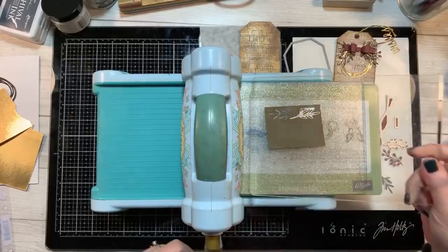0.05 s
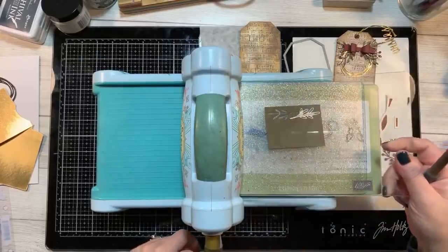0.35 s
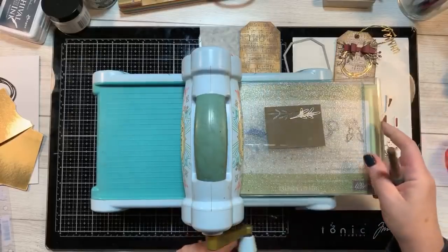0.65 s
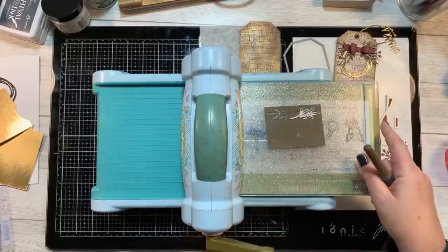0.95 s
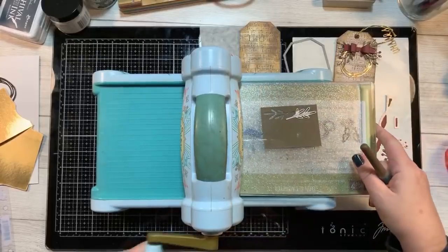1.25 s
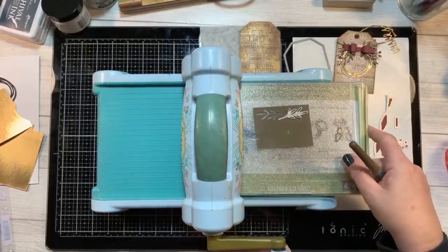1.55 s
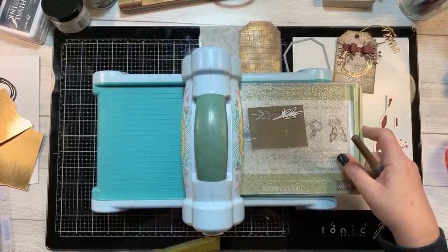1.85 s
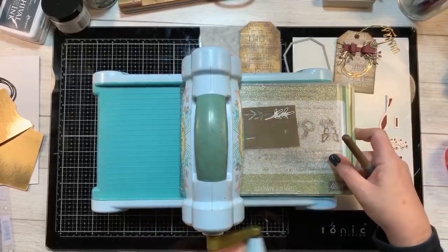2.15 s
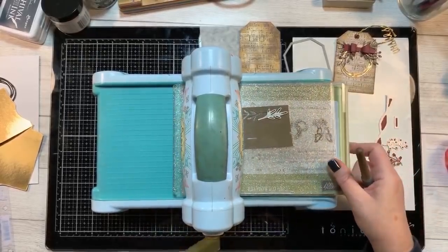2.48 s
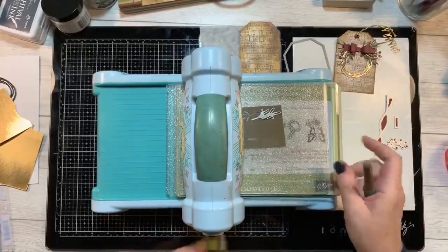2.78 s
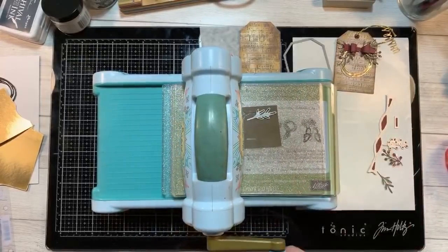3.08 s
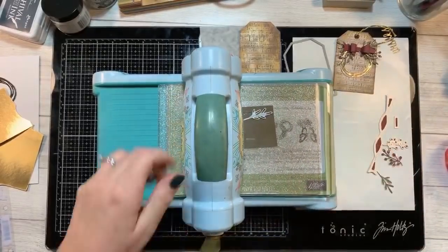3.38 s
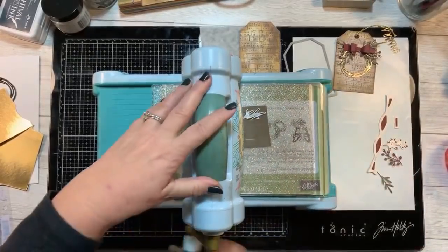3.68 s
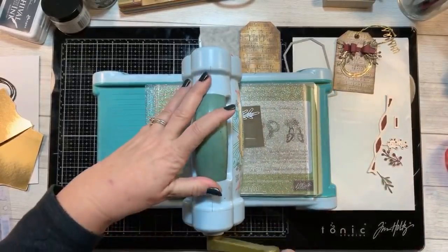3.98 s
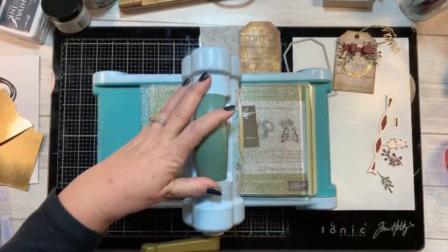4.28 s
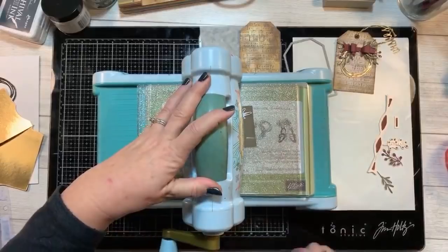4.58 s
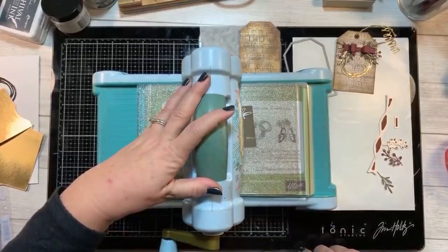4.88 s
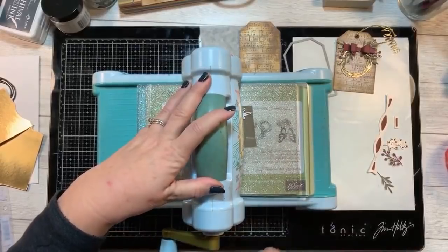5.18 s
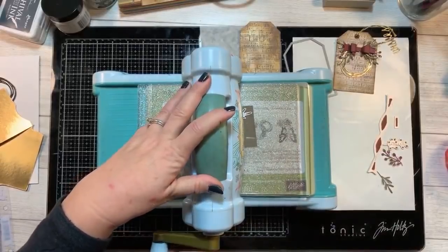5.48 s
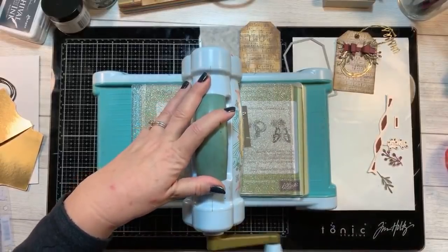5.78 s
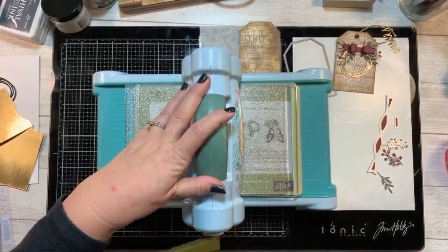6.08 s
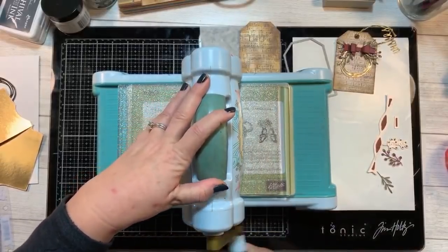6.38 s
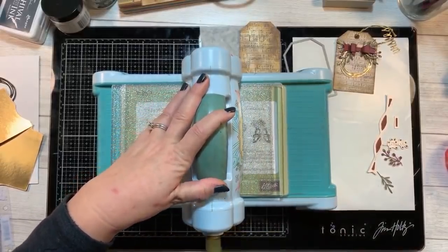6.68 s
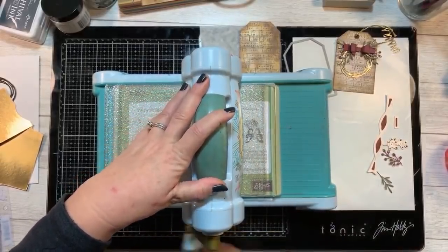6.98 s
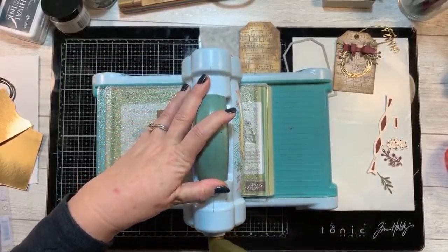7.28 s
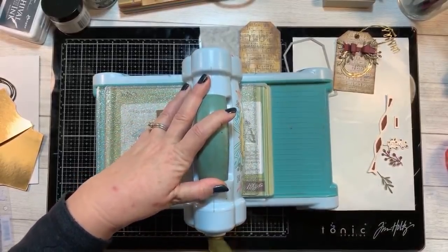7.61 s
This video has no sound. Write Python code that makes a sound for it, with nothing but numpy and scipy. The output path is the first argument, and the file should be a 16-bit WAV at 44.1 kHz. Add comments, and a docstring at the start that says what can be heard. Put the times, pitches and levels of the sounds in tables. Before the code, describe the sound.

In a small room with a steady hiss, a die-cutting machine is cranked by hand, heard from just above. Plastic plates butt against the rollers with two clunks, then pass through with irregular hollow gear knocks, dry snaps and soft scraping over a low table rumble. A dull bump and a faint squeal mark a short lull before the knocking returns and the plates give a loud crack.

```python
"""Two hollow clunks: plastic plates butt against the rollers of a hand-cranked die-cutting machine.
They are cranked through: gear teeth knock in the hollow housing, the rollers grind, and the squeezed
plates, die and paper crack and rub, with one faint squeal in a lull. The machine bumps and rocks,
and the craft table rumbles under the turning hand. Heard from just above, in a small room with a
steady hiss."""
import sys
import numpy as np
from scipy import signal
from scipy.fft import rfft, irfft
from scipy.io import wavfile

SR = 44100
rng = np.random.default_rng(int(sys.argv[2]) if len(sys.argv) > 2 else 0)


def unload_audio(sound):
    """Save the sound as a 16-bit wav file, at the path given as the first command line argument."""
    columns = np.transpose(np.atleast_2d(sound))
    # keep every value between -1 and 1, then stretch to whole-number steps
    steps = np.round(np.clip(columns, -1, 1) * 32767)
    wavfile.write(sys.argv[1], SR, steps.astype(np.int16))


N = 337365
HIT_S, ATTACK_S = .4, .025
HIT_N = int(HIT_S * SR)
AGE_S, CLOCK_S = np.arange(HIT_N) / SR, np.arange(N) / SR
SCATTER_DB = 2.5
ROCK_HZ, ROCK_T60_S = 58.8, .34  # machine rocking on the table
BOARD_HZ, BOARD_T60_S = 128.3, .099  # table top

# Table levels are relative; the functions add gains. *_EDGES_HZ are band edges.
# loud gear knocks: t/s, level/dB, tilt/(dB/octave), rocking/dB
KNOCKS = [(0.222, -45.5, -2, -69), (0.26, -41, -4, -64), (0.49, -54.5, 0.5, -67), (0.538, -45.5, 0.5, -62),
          (0.853, -53.5, -3.5, -59), (0.869, -52.5, -6, -58), (0.984, -50, -4, -45.5),
          (1.01, -52, 0.5, -45), (1.203, -53, -5, -68), (1.215, -48.5, -4.5, -51), (1.296, -48.5, -2, -49),
          (1.322, -47, -3, -59), (1.473, -52.5, 0, -51), (1.566, -47.5, 3.5, -43.5), (1.631, -45, 1, -42.5),
          (1.655, -42.5, -2.5, -47), (1.724, -59, -8, -50), (1.894, -47.5, 0.5, -57),
          (1.925, -54.5, 2.5, -62), (1.996, -50.5, -2.5, -61), (2.069, -50, -3, -47.5),
          (2.196, -47.5, -1.5, -56), (2.311, -47.5, -1.5, -53), (2.33, -59, 0.5, -56),
          (2.396, -49, -3, -48), (2.596, -50.5, -0.5, -57), (2.711, -54, -1.5, -61), (2.792, -56, 2.5, -48),
          (2.817, -56, 5, -61), (2.855, -57, -10, -52), (2.92, -61.5, 5.5, -54.5), (2.993, -55.5, 4, -72),
          (3.058, -52, 1.5, -61), (3.079, -47, -1.5, -50.5), (3.112, -57.5, 2.5, -60), (3.31, -62, -1, -55),
          (3.385, -66, -6, -55), (3.59, -53, 2, -48.5), (3.802, -56, 0.5, -66), (3.858, -46.5, -3, -58),
          (3.975, -54.5, -2.5, -55), (3.995, -53.5, 1, -52), (4.203, -49, -3, -50.5),
          (4.235, -50, -2.5, -57), (5.326, -41.5, 0, -56), (5.402, -58.5, 2.5, -55),
          (5.449, -58.5, -2.5, -68), (5.496, -50.5, -2, -45), (5.557, -49, -1.5, -60),
          (5.72, -55, -3.5, -50), (5.758, -55.5, 1, -61), (5.86, -54.5, -2.5, -58),
          (5.902, -50, -2.5, -50.5), (6.215, -56.5, 2.5, -51), (6.313, -58.5, 2, -49.5),
          (6.448, -63, 1, -68), (6.556, -53.5, 0.5, -58), (6.661, -52, 0.5, -62), (6.967, -54, -1, -66),
          (7.104, -56, -7, -74), (7.149, -48.5, 2.5, -56), (7.178, -50.5, -6, -61), (7.334, -56, -1, -48),
          (7.349, -52, 0, -70), (7.502, -62, -7.5, -52), (7.557, -60.5, -3.5, -58)]
KNOCK_EDGES_HZ = [210, 600, 1150, 2800, 7000]
KNOCK_BAND_DB = [-4.5, .93, -6.5, -14.5]
# crank load, as roller grinding: t/s, level/dB
CRANK_LOAD = [(0, -77), (.15, -79), (.3, -56.5), (.48, -39), (.62, -63), (.81, -73), (1.17, -60),
              (1.32, -54.5), (1.44, -62), (1.68, -55), (1.84, -65), (1.98, -50), (2.28, -65.5),
              (2.85, -54.5), (3.2, -66.5), (3.6, -58), (3.75, -69), (4.26, -63), (4.56, -79.5), (5.2, -90),
              (5.5, -61), (6.02, -66), (6.3, -59), (6.85, -64.5), (7.12, -55), (7.28, -69), (7.65, -71)]
# plates meeting the rollers: t/s, then level/dB per band
PLATE_HITS = [(0.1459, -26.5, -27, -30.5, -40.5, -44), (0.4006, -27.5, -36, -44, -49.5, -55)]
PLATE_EDGES_HZ = [200, 560, 1150, 2800, 7000, 16000]
# stack cracking: t/s, level/dB, tilt/(dB/octave), treble edge/Hz, note/Hz, note t60/s
CRACKS = [(0.331, -47.5, -3, 7000, 1970, 0.047), (0.694, -49.5, -3.5, 5000, 1533, .12),
          (1.31, -56, 0, 10000, 1740, .015), (1.365, -48.5, -.7, 10000, 1720, .012),
          (1.5205, -51, 0.5, 8000, 1766, 0.064), (1.528, -50, 1.5, 8000, 1630, .02),
          (1.546, -43.5, 0.5, 11500, 1650, 0.069), (1.7101, -48, 0, 4260, 4700, 0.062),
          (1.838, -60.5, -1, 6000, 2030, .012), (2.009, -48.5, -1, 8000, 4820, 0.061),
          (2.054, -55, 0.5, 5000, 2120, 0.016), (2.5787, -51, -1, 6260, 5960, 0.039),
          (2.7, -54, -4, 6000, 6000, 0.046), (2.909, -55.5, -6, 5000, 1730, 0.0091),
          (3.085, -51.5, -4, 11000, 3180, 0.01), (3.196, -77, 3.5, 15000, 8410, .012),
          (3.612, -47.5, -3, 6500, 3220, 0.049), (3.776, -51.5, 7, 6900, 6220, 0.033),
          (3.869, -49.5, -1.5, 4860, 3240, 0.0091), (4.212, -57, 0, 6030, 4980, .012),
          (4.283, -64.5, 3.5, 15000, 8410, 0.0098), (4.665, -61, 3.5, 9000, 3870, 0.0079),
          (4.681, -54, -3, 10000, 1750, 0.056), (5.3242, -47.5, 2.5, 4800, 3670, 0.04),
          (5.327, -57.5, 4, 7000, 6480, 0.089), (5.565, -64.5, 1.5, 15000, 1571, 0.014),
          (5.854, -53, -3, 2580, 2200, 0.021), (6.662, -52.5, -2.5, 6000, 2070, 0.019),
          (6.9938, -34.5, -0.7, 9300, 1974, .04), (6.995, -42.5, 3.5, 4500, 3120, 0.032),
          (6.9953, -42.5, -1, 12000, 1600, .11)]
CRACK_EDGES_HZ = [300, 1150, 2800, 7000, 10000, 16000]
CRACK_BAND_DB = [-.67, -.44, .38, -.74, -.5]
# plates rubbing on the bed: t/s, level/dB
BED_RUB = [(0, -59.5), (.12, -68.5), (.42, -57), (.81, -65), (1.02, -61.5), (1.4, -62.5), (1.68, -65),
           (1.8, -64), (2.08, -57), (2.45, -68), (2.9, -64), (3.25, -69), (3.65, -64.5), (4.26, -73),
           (4.6, -82), (5.2, -82), (5.45, -74), (6.0, -70), (6.8, -71), (7.12, -57.5), (7.45, -78),
           (7.65, -85)]
# friction swells, the stack jerking forward or a hand sliding on a plate: t/s, length/s, low/Hz, high/Hz,
# level/dB
SHOVES = [(0.115, 0.039, 2000, 14000, -53.5), (0.869, 0.29, 4800, 13100, -58.5),
          (1.537, 0.049, 1500, 14000, -58), (1.878, 0.21, 1500, 6700, -58.5),
          (2.227, 0.12, 7260, 9300, -63), (4.28, 0.055, 9000, 15500, -64), (4.35, .22, 6000, 13000, -68.5),
          (5.144, .25, 6000, 12000, -69.5), (6.155, 0.32, 1480, 5900, -65.5),
          (7.042, 0.26, 2000, 10900, -65)]
# rollers squealing: t/s, f/Hz, level/dB
SQUEAL = [(4.8, 1790, -78), (4.84, 1800, -71), (4.96, 1870, -78), (5.03, 1780, -74), (5.1, 1780, -85)]
# machine bumping the table: t/s, rocking/dB, table top/dB, thud/dB
THUMPS = [(0.145, -56, -41.5, -67), (0.401, -70, -49, -63), (1.56, -38.5, -65, -49),
          (4.652, -73, -72, -56.5), (4.663, -55, -40, -39), (4.68, -59, -42.5, -47),
          (4.789, -70, -50.5, -50.5), (5.328, -47, -52, -75), (6.999, -63, -39.5, -48)]
# modes: f/Hz, level/dB, t60/s
HOUSING_MODES = [(249.6, -7, 0.05), (369, -7.5, 0.099), (474.5, 1, 0.097), (555.5, -7.5, 0.13),
                 (646.6, -5, 0.08), (735, -1, 0.068), (804.5, -3, 0.11), (940, 6, 0.023),
                 (1160, -27.5, 0.11), (1303, -9.5, 0.041), (1448, -18.5, 0.054), (1613, 0.5, 0.033),
                 (1730, 5, 0.0063), (1940, 12, 0.0057), (2006, -4.5, 0.019), (2440, -13, 0.027),
                 (3196, -6, 0.049), (3890, -2.5, 0.015), (4670, -11, 0.083), (5030, -24, 0.033),
                 (5456, -34, 0.038), (5880, -35.5, 0.01), (8560, 3, 0.041)]  # housing shaken by its gears
CLUNK_MODES = [(266, -26, 0.01), (463, -3, 0.1), (667, -4.5, 0.069), (730, -2.5, 0.044), (856, -6, 0.046),
               (896, -22, 0.11), (1185, -15, 0.1), (1390, -4.5, 0.028), (1536, -0.5, 0.032),
               (1740, -13, 0.051), (1935, -14.5, 0.099), (2164, -16, .06), (2850, -30, 0.052),
               (3720, -17, 0.043)]  # housing struck through the plates
SHEET_MODES = [(1350, -17.5, 0.33), (1590, 7.5, 0.016), (1745, 7, 0.03), (2098, 4.5, 0.038),
               (3092, -2.5, 0.017), (3910, 1, 0.027), (4900, 2.5, 0.015), (5670, 5, 0.0097),
               (6100, -38, 0.007), (7760, -10.5, 0.025), (8480, 6.5, 0.024), (9100, -1, 0.02)]  # stiff cutting plates
FEET_MODES = [(183, 3, 0.25), (258, 21, 0.028), (283, 1.5, 0.15), (375, 2, 0.045), (440, -7.5, 0.15)]  # feet on the mat
# room noise and hiss: f/Hz, spectral density/dB
AIR_SPECTRUM = [(25, 2), (45, 3), (85, 5), (125, -7.5), (230, -5.5), (330, -12), (1000, -15), (1400, -18.5),
                (2200, -20), (4000, -23.5), (7700, -26.5), (8500, -22), (10000, -25.5), (16000, -28)]


def gear_knocks(chatter_db=-7, crunch_db=-9, tick_db=-9, pivot_hz=830):
    """A tooth takes up its slack, chatters, crunches on and rings the housing."""
    out = np.zeros(N)
    octaves = np.log2(centres_hz(KNOCK_EDGES_HZ) / pivot_hz)
    for t_s, db, tilt_db_oct in teeth():
        chatter = undb(chatter_db) * crackle(.062, per_s=1500)
        crunch = undb(crunch_db + tilt_db_oct) * crackle(.27, per_s=160)  # brighter is grittier
        force = chatter + crunch
        force[0] += .9  # first impact
        body = unit(signal.fftconvolve(force, housing())[:HIT_N])
        tick = undb(tick_db) * unit(soften(force, 2500))
        levels_db = db + tilt_db_oct * octaves + KNOCK_BAND_DB
        add(out, t_s, colour(body + tick, KNOCK_EDGES_HZ, levels_db))
    return out


def teeth(per_s=8, over_load_db=-7):
    """Loud knocks, plus quiet teeth meshing unevenly between them as hard as the crank is loaded."""
    load_db, = curves(CRANK_LOAD)
    loud = np.array(KNOCKS)[:, :3]
    quiet = []
    for k, (late, strength, tilt_db_oct) in enumerate(rng.standard_normal((100, 3))):
        t_s = (k + 1 + late / 4) / per_s
        if t_s < CLOCK_S[-1] and np.abs(loud[:, 0] - t_s).min() > .5 / per_s:
            db = load_db[int(t_s * SR)] + over_load_db + SCATTER_DB * strength
            quiet.append((t_s, db, tilt_db_oct))
    return list(loud) + quiet


def housing(dense_db=-3):
    """Tap response of the housing: clear modes among dense, quickly damped ones."""
    dense = band(burst(.046), 830, 6700, order=1)
    return unit(ring(HOUSING_MODES)) + undb(dense_db) * unit(dense)


def plate_hits(clatter_db=-3, tail_db=-25):
    """The stack meets the rollers: a hollow clunk with a short plastic clatter."""
    out = np.zeros(N)
    clunk = sum((-1) ** k * undb(db) * sine(hz) * fade(t60_s)
                for k, (hz, db, t60_s) in enumerate(CLUNK_MODES))
    for t_s, *levels_db in PLATE_HITS:
        clatter = soften(burst(.076) + undb(tail_db) * burst(.71), 1100)
        hit = unit(clunk) + undb(clatter_db) * unit(clatter)
        add(out, t_s, colour(hit, PLATE_EDGES_HZ, levels_db))
    return out


def cracks(gain_db=-2, tail_db=-28, fibre_db=-12, sheet_db=-2, shell_db=-9, focus_db=3, focus_oct=.5):
    """Stressed plastic lets go: a dry snap, tearing paper fibres, a brief ring of plate and housing."""
    out = np.zeros(N)
    hz = centres_hz(CRACK_EDGES_HZ)
    for t_s, db, tilt_db_oct, edge_hz, note_hz, _ in CRACKS:
        snap = soften(burst(.011) * (1 - fade(.016)), 5000)
        tail = undb(tail_db) * soften(burst(.23), 2500)
        fibres = undb(fibre_db) * crackle(.1, per_s=700)
        shell = undb(shell_db) * unit(band(housing(), 414, 990))
        sheet = undb(sheet_db) * unit(ring(SHEET_MODES))
        hit = unit(snap + tail + fibres) + sheet + shell
        near_note_db = focus_db * np.exp(-(np.log2(hz / note_hz) / focus_oct) ** 2)
        levels_db = db + crack_shape_db(hz, tilt_db_oct, edge_hz) + near_note_db + CRACK_BAND_DB
        add(out, t_s, colour(hit, CRACK_EDGES_HZ, levels_db))
    return undb(gain_db) * out


def crack_notes(gain_db=8, split=.016, twin_db=-6):
    """A note sings on, set by where the stack gives way; the two plates ring slightly apart."""
    out = np.zeros(N)
    for t_s, db, tilt_db_oct, edge_hz, hz, t60_s in CRACKS:
        twin_hz = hz * (1 + split * rng.standard_normal())
        pair = sine(hz) + undb(twin_db) * sine(twin_hz)
        note_db = db + crack_shape_db(hz, tilt_db_oct, edge_hz) + gain_db
        add(out, t_s, pair * fade(t60_s) * undb(note_db))
    return out


def crack_shape_db(hz, tilt_db_oct, edge_hz, pivot_hz=1740):
    """Crack spectrum: a quicker release is brighter, with a higher treble edge."""
    return tilt_db_oct * np.log2(hz / pivot_hz) - 10 * np.log10(1 + (hz / edge_hz) ** 8.6)


def sliding(direct_db=-8, plate_db=-2, brush_db=-9, uneven_db=2):
    """Dense tiny slips: rollers grind in the housing, plates rub along the bed, surfaces brush."""
    load_db, rub_db = curves(CRANK_LOAD) + curves(BED_RUB)
    grip = undb(uneven_db * noise(N, 3.2, 41))  # catch and release bunches the slips
    slips = grains(per_s=2000, spread_db=1.5) * grip
    body = np.zeros(N)
    for stretch in np.array_split(np.arange(N), 50):  # each stretch of bed rings differently
        add(body, CLOCK_S[stretch[0]], signal.fftconvolve(slips[stretch], housing()))
    body = unit(body) + undb(direct_db) * unit(slips)
    rollers = unit(band(body, 121, 1630, order=3)) * undb(load_db)
    plates = unit(band(body, 1660, 4700)) * undb(rub_db + plate_db)
    fine = grains(per_s=12000, spread_db=0)
    brush = band(fine, 4000, 18000) + 3.5 * band(fine, 7800, 9000, order=1)
    return rollers + plates + unit(brush) * undb(rub_db + brush_db)


def shoves():
    """Fine friction swells as the stack jerks forward or a hand slides along a plate."""
    out = np.zeros(N)
    for t_s, length_s, lo_hz, hi_hz, db in SHOVES:
        swell = np.sin(np.pi * np.minimum(AGE_S / length_s, 1)) ** 2
        add(out, t_s, undb(db) * swell * noise(HIT_N, lo_hz, hi_hz))
    return out


def squeal(waver_hz=22):
    """The rollers squeal faintly on one unsteady pitch."""
    hz, db = curves(SQUEAL)
    hz = hz + waver_hz * noise(N, 8, 120)
    gate = (CLOCK_S > SQUEAL[0][0]) & (CLOCK_S < SQUEAL[-1][0])
    return np.sin(2 * np.pi * np.cumsum(hz) / SR) * undb(db) * gate


def thumps(gain_db=2):
    """The machine drops on its feet: a dull thud at once, rocking and table top building later."""
    out = np.zeros(N)
    for t_s, rock_db, board_db, thud_db in THUMPS:
        rock = sine(ROCK_HZ) * fade(ROCK_T60_S) * (1 - fade(.11))
        board = sine(BOARD_HZ) * fade(BOARD_T60_S) * (1 - fade(.066))
        thud = band(ring(FEET_MODES), 88, 570)
        add(out, t_s, at_level(rock, rock_db) + at_level(board, board_db) + at_level(thud, thud_db))
    return undb(gain_db) * out


def sway(rock_gain_db=3, board_gain_db=-3, peak_s=.021, detune=.043):
    """Each loud knock rocks the machine and swings the table top; both swell, then die away."""
    out = np.zeros(N)
    swell = AGE_S / peak_s * np.exp(1 - AGE_S / peak_s)
    for t_s, knock_db, _, rock_db in KNOCKS:
        board_db = (rock_db + knock_db) / 2
        for hz, db in (ROCK_HZ, rock_db + rock_gain_db), (BOARD_HZ, board_db + board_gain_db):
            swing = sine(hz * (1 + detune * rng.standard_normal()))
            add(out, t_s, undb(db) * swell * swing)
    return out


def rumble(rock_db=-67, board_db=-65, load_follow=.55):
    """Uneven crank force keeps both table resonances moving, more so under load."""
    load_db, = curves(CRANK_LOAD)
    out = np.zeros(N)
    for hz, t60_s, db in (ROCK_HZ, ROCK_T60_S, rock_db), (BOARD_HZ, BOARD_T60_S, board_db):
        shake = signal.fftconvolve(rng.standard_normal(N), sine(hz) * fade(t60_s))[:N]
        out += unit(band(shake, hz * 1.06, hz * 2.9)) * undb(db)
    return out * undb(load_follow * (load_db - load_db.mean()))


def room(x, wet_db=-11, top_db=-5):
    """Small furnished room: diffuse reflections build in milliseconds, the very top is absorbed."""
    low = band(burst(.15), 180, 2500)
    high = band(burst(.16), 2500, 9000)
    top = undb(top_db) * band(burst(.083), 9000, 16000)
    tail = (low + high + top) * (1 - fade(.042))
    tail /= np.sqrt(2 * np.sum(tail ** 2))
    return x + undb(wet_db) * signal.fftconvolve(x, tail)[:N]


def air(level_db=-60):
    """Steady room noise and hiss."""
    hz, db = np.transpose(AIR_SPECTRUM)
    bins_hz = np.maximum(np.fft.rfftfreq(N, 1 / SR), 1)
    shape = undb(np.interp(np.log(bins_hz), np.log(hz), db))
    return unit(irfft(rfft(rng.standard_normal(N)) * shape, N)) * undb(level_db)


def ring(modes, detune=.012):
    """Damped modes; each blow lands elsewhere, reweighting and slightly shifting them."""
    hz, db, t60_s = np.transpose(modes)
    weight, shift, side = rng.standard_normal((3, len(hz)))
    poles = 2j * np.pi * hz * (1 + detune * shift) - np.log(1000) / t60_s
    gains = np.sign(side) * undb(db + SCATTER_DB * weight)
    return gains @ np.exp(np.outer(poles, AGE_S)).imag


def colour(x, edges_hz, levels_db):
    """Hardness and place of a contact set the level of each band."""
    return sum(at_level(band(x, lo_hz, hi_hz, order=4), db)
               for lo_hz, hi_hz, db in zip(edges_hz, edges_hz[1:], levels_db))


def at_level(x, db):
    """Set the rms of a hit's first ATTACK_S."""
    return x * undb(db) / np.sqrt(np.mean(x[:int(ATTACK_S * SR)] ** 2))


def soften(x, hz):
    """Finite contact hardness: gentle low-pass."""
    return signal.sosfilt(signal.butter(1, hz, fs=SR, output="sos"), x)


def grains(per_s, spread_db):
    """Random slips, most small, a few large."""
    size = undb(spread_db * np.minimum(rng.exponential(size=N), 2 * np.pi))
    return (rng.random(N) < per_s / SR) * size * rng.standard_normal(N)


def crackle(t60_s, per_s):
    """Sparse decaying clicks."""
    return burst(t60_s) * (rng.random(HIT_N) < per_s / SR)


def burst(t60_s):
    """Decaying noise."""
    return rng.standard_normal(HIT_N) * fade(t60_s)


def noise(n, lo_hz, hi_hz):
    """Band noise, rms 1."""
    return unit(band(rng.standard_normal(n), lo_hz, hi_hz))


def sine(hz):
    """Tone, one hit long."""
    return np.sin(2 * np.pi * hz * AGE_S)


def fade(t60_s):
    """Exponential decay, one hit long."""
    return np.exp(-np.log(1000) * AGE_S / t60_s)


def band(x, lo_hz, hi_hz, order=2):
    """Causal band-pass."""
    return signal.sosfilt(signal.butter(order, [lo_hz, hi_hz], "band", fs=SR, output="sos"), x)


def centres_hz(edges_hz):
    """Geometric band centres."""
    return np.sqrt(np.multiply(edges_hz[:-1], edges_hz[1:]))


def curves(table):
    """Columns interpolated over time."""
    t_s, *columns = np.transpose(table)
    return [np.interp(CLOCK_S, t_s, column) for column in columns]


def add(track, t_s, sound):
    """Mix in at t_s."""
    start = max(int(t_s * SR), 0)
    track[start:start + len(sound)] += sound[:N - start]


def undb(db):
    """dB to gain."""
    return 10 ** (np.asarray(db) / 20)


def unit(x):
    """Scale to rms 1."""
    return x / np.sqrt(np.mean(x ** 2))


def scene():
    """Machine, table and room; mono."""
    machine = plate_hits() + gear_knocks() + cracks() + crack_notes() + shoves() + squeal()
    return (room(machine) + thumps() + sway() + rumble() + sliding() + air())[None]


def record(dry):
    """Thin the deepest bass, cut the top."""
    low_hz, top_hz = 38, 15900
    thinned = signal.sosfilt(signal.butter(3, low_hz, "high", fs=SR, output="sos"), dry)
    return signal.sosfilt(signal.ellip(10, .2, 70, top_hz, fs=SR, output="sos"), thinned)


dry = scene()
out = record(dry)
unload_audio(out)
```